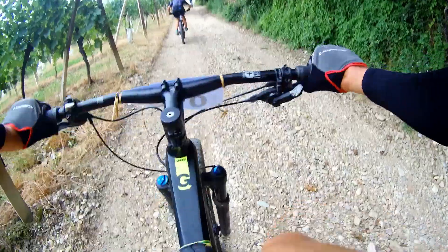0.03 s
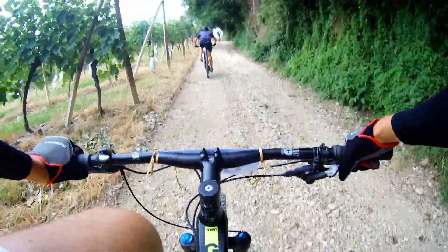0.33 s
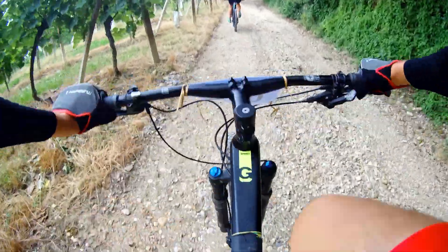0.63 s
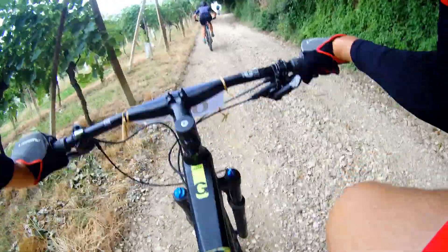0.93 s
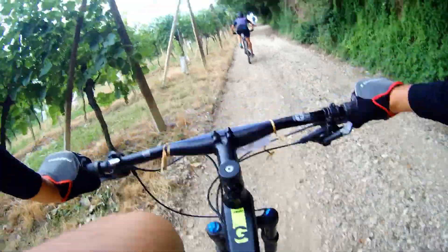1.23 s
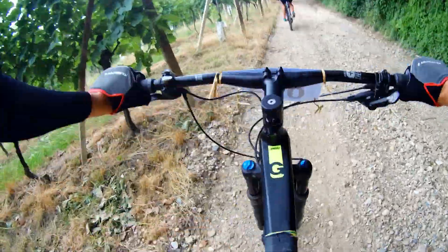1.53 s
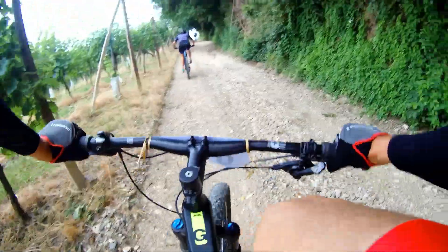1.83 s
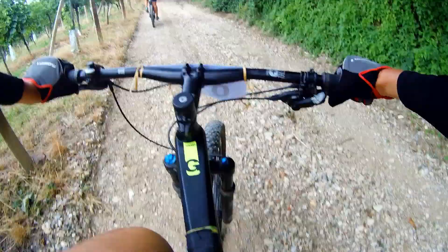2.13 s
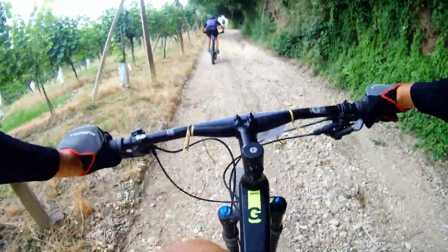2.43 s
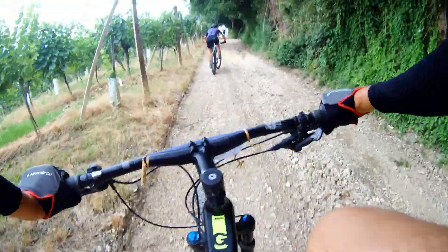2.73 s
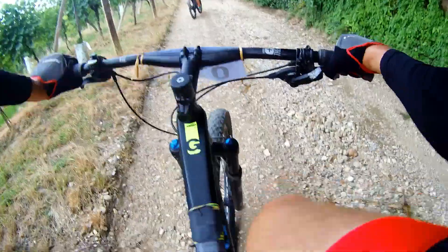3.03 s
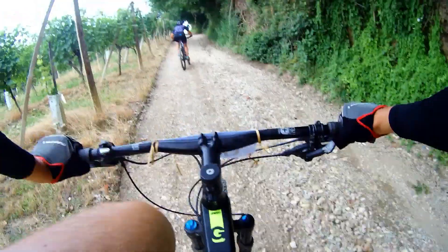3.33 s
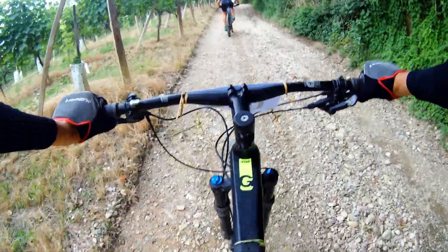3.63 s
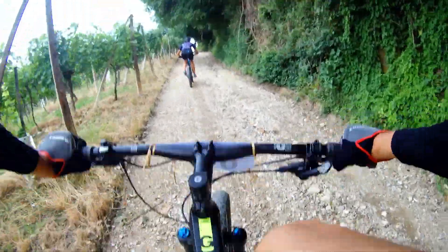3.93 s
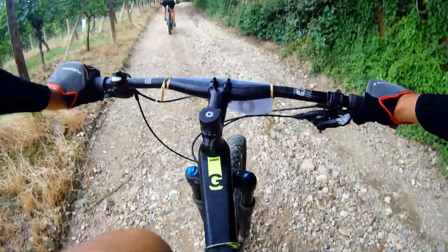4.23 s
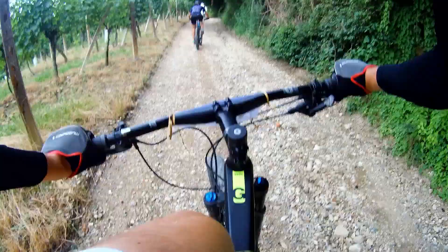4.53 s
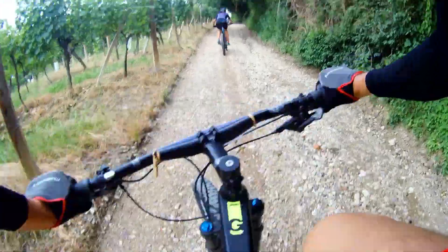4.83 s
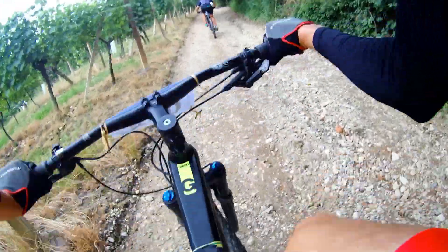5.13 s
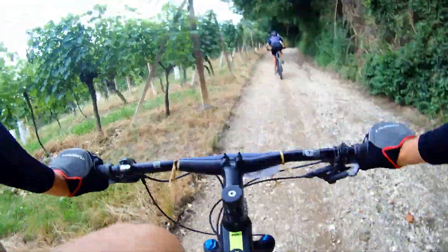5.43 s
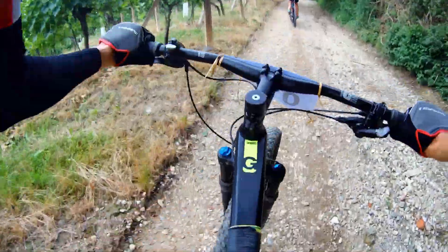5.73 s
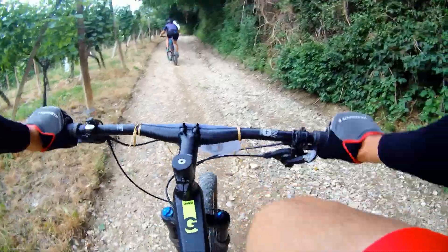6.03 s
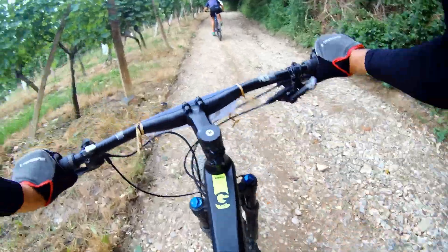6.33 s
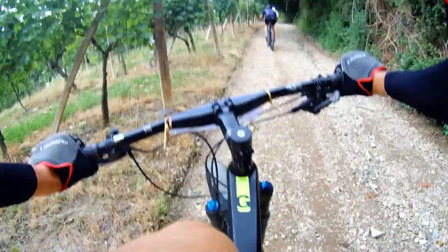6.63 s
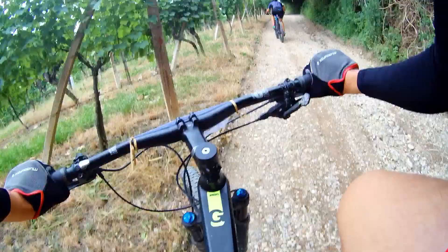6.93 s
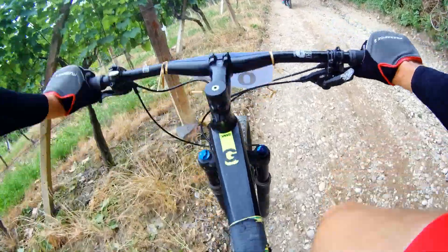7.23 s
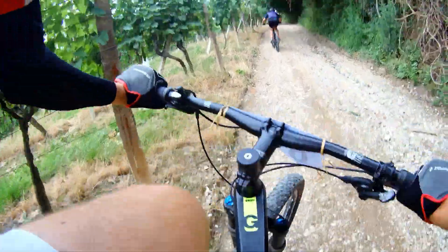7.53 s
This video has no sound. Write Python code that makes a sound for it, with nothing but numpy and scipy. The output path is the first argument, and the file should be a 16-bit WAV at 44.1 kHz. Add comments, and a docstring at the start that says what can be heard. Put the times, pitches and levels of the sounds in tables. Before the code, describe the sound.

Dull, regular thumps pulse over bike tyres rumbling and crunching on gravel, with scattered knocks, clicks and a thin hum.

```python
"""Mountain bike on loose gravel

A climb, heard from a camera in a closed case on the rider's chest. Dull, even thumps, most likely
the racing pulse, swing the camera on its strap; the mount knocks in its play. Tyres rumble and crunch
by countless small impacts, stones click, the case hums at resonance, and a limiter ducks on big blows."""
import sys
import numpy as np
from scipy import signal
from scipy.fft import rfft, irfft, next_fast_len
from scipy.io import wavfile
from scipy.ndimage import minimum_filter1d, map_coordinates

SR = 44100
rng = np.random.default_rng(int(sys.argv[2]) if len(sys.argv) > 2 else 0)


def master(y):
    """Save y as 16-bit WAV."""
    cut = np.clip(np.atleast_2d(y).T, -1, 1)
    pcm = np.round(cut * 32767)  # scale
    wavfile.write(sys.argv[1], SR, pcm.astype(np.int16))


N = 338247


def amp(db):
    """Amplitude ratio of a level in decibels."""
    return 10 ** (np.asarray(db) / 20)


def unit(x):
    """Normalisation to rms 1."""
    return x / np.sqrt(np.mean(x ** 2) + 1e-20)


def wobble(rate):
    """Slow random modulation: a spline through rate knots a second."""
    knots = rng.standard_normal(int(N * rate / SR) + 4)
    return map_coordinates(knots, [np.arange(N) * rate / SR])


def filtered(x, response):
    """Linear filtering: the spectrum of x times a frequency response."""
    size = next_fast_len(N + 8192)
    return irfft(rfft(x, size) * response(np.fft.rfftfreq(size, 1 / SR)), size)[:N]


def coloured(x, spectrum):
    """Spectral shaping by (frequency_hz, level_db) points, at rms 1."""
    f, db = np.transpose(spectrum)
    return unit(filtered(x, lambda hz: amp(np.interp(np.log(hz + 1), np.log(f), db))))


def add(track, start_s, sound):
    """Superposition of a sound on the track."""
    start = max(0, round(start_s * SR))
    part = track[start:start + len(sound)]
    part += sound[:len(part)]


def strokes(rows):
    """Amplitude envelope of tapered (start_s, length_s, level_db) bursts."""
    out = np.zeros(N)
    for start_s, length_s, db in rows:
        add(out, start_s, amp(db) * signal.windows.tukey(int(length_s * SR), .5))
    return out


def impacts(per_s, spread_db, clump_db):
    """Shot noise: random contacts of unequal size, clumped in strength, at rms 1."""
    contact = rng.random(N) < per_s / SR
    size = amp(spread_db * np.minimum(rng.exponential(size=N), 4))
    return unit(contact * size * rng.standard_normal(N) * amp(clump_db * wobble(45)))


def swing(t, hz, rise_s, fall_s, sag_s):
    """Damped oscillation of the camera on its strap, furthest at t = 0 and slowing as it dies."""
    swell = np.where(t < 0, np.exp(-.5 * (t / rise_s) ** 2), 1 / (1 + (t / fall_s) ** 2))
    turns = hz * sag_s * (1 - np.exp(-t / sag_s))
    return swell * signal.windows.tukey(len(t), .5) * np.cos(2 * np.pi * turns)


# spectrum of the microphone's hiss: frequency_hz, level_db
HISS_SPECTRUM = [(1000, 0.62), (5000, 0.74), (8000, -1), (11500, -1.3), (13000, 0.39), (14000, -1.3),
                 (16000, -1.6)]

def hiss(level_db=-52.5):
    """Self-noise: the microphone adds a steady, nearly white floor."""
    return amp(level_db) * coloured(rng.standard_normal(N), HISS_SPECTRUM)


# roughness of the track against its usual state: time_s, level_db
TRACK_ROUGHNESS = [(0.0, -0.5), (0.51, -2), (0.75, 3), (1.2, -1.7), (2.41, 1), (2.69, -0.5), (2.89, -4),
                   (2.99, 1.0), (4.34, 1), (4.74, 1.5), (4.96, -2.5), (5.29, 1.3), (5.55, -3.5), (5.8, 2),
                   (6.59, -2), (6.75, 0.6), (7.67, -2.5)]

def roughness_db():
    """Surface excitation: the track's roughness, interpolated to every sample."""
    time_s, level_db = np.transpose(TRACK_ROUGHNESS)
    return np.interp(np.arange(N) / SR, time_s, level_db)


def case_hum(hz=1400, width_hz=80, level_db=-43, follow=0.35, waver_db=2.6):
    """Forced resonance: tyre noise sustains the main mode of the case as a thin, wavering hum."""
    resonance = lambda f: (1j * f * 2 * width_hz / (hz ** 2 - f ** 2 + 2j * f * width_hz)) ** 2
    ring = unit(filtered(impacts(per_s=3000, spread_db=2, clump_db=1.5), resonance))
    return ring * amp(level_db + follow * roughness_db() + waver_db * wobble(6.5))


# spectra of the shaken rider, rolling tyres and crunching gravel: frequency_hz, level_db
SHAKE_SPECTRUM = [(8, -18), (20, -1.5), (36, 0), (60, -11.5), (100, -14), (160, -22), (300, -47),
                  (800, -120)]
ROLL_SPECTRUM = [(60, -27), (130, -2), (200, 0), (300, -2.5), (480, -6.5), (700, -11.5), (1080, -10.5),
                 (1170, -12), (1400, -21), (1800, -18.5), (2600, -53), (5000, -120)]
CRUNCH_SPECTRUM = [(900, -36), (1700, 3.5), (2150, 0), (2450, 1), (2800, 2), (3400, -4.5), (3950, 4.5),
                   (4300, -10.5), (5500, -26), (9000, -32), (14000, -120)]

def tyres(shake_db=-25, roll_db=-39, crunch_db=-53, shake_drift_db=2, drift_db=0.77, clump_db=2.37):
    """Rolling noise: rougher track shakes the rider harder, and the gravel rolls and crunches louder."""
    rough_db = roughness_db()
    clumps = unit(amp(clump_db * wobble(30)))  # stones shift in clumps under the knobs
    shake = amp(shake_db + 0.9 * rough_db + shake_drift_db * wobble(7))
    shake *= coloured(rng.standard_normal(N), SHAKE_SPECTRUM)
    roll = amp(roll_db + 0.66 * rough_db + drift_db * wobble(7))
    roll *= coloured(impacts(per_s=1800, spread_db=1, clump_db=0.56), ROLL_SPECTRUM)
    crunch = amp(crunch_db + 0.63 * rough_db + drift_db * wobble(7))
    crunch *= coloured(impacts(per_s=2500, spread_db=0, clump_db=1), CRUNCH_SPECTRUM)
    return shake + clumps * (roll + crunch)


# stones slide from under a tyre: start_s, length_s, level_db
STONE_SKIDS = [(1.03, 0.042, -34), (1.19, 0.041, -33.5), (2.64, 0.083, -38), (3.16, 0.065, -36),
               (4.68, 0.13, -40), (5.175, 0.036, -34.5), (6.745, 0.063, -37.5)]

def skids(crunch_db=-14):
    """Sliding friction: stones grind past each other in coarse bursts."""
    grind = impacts(per_s=1200, spread_db=2, clump_db=0.5)
    crunch = amp(crunch_db) * coloured(grind, CRUNCH_SPECTRUM)
    return strokes(STONE_SKIDS) * (coloured(grind, ROLL_SPECTRUM) + crunch)


# spectrum of rubbed cloth: frequency_hz, level_db
CLOTH_SPECTRUM = [(1000, -2), (2200, -3), (3000, -3), (3800, -6), (4230, 5.5), (4600, -7), (5000, -9),
                  (6000, -12.5), (9000, -30), (14000, -120)]
# the strap rubs on cloth: start_s, length_s, level_db
STRAP_RUBS = [(0.83, 0.091, -42.5), (0.915, 0.032, -42.5), (1.019, 0.031, -49), (1.884, 0.039, -37.5),
              (4.95, 0.036, -47)]

def rubs():
    """Stick-slip friction: cloth catches and slips under the strap in short, thin scrapes."""
    slips = impacts(per_s=3200, spread_db=-1.5, clump_db=1.5)
    return strokes(STRAP_RUBS) * coloured(slips, CLOTH_SPECTRUM)


# modes of the camera case: pitch_hz, level_db, t60_s
CASE_MODES = [(1013, -4.5, 0.023), (1362, -4, 0.037), (1940, -15, 0.018)]

def case_ring(t, scatter_db):
    """Free vibration: the struck case rings in decaying modes, at new strengths for each blow."""
    return sum(amp(db + rng.normal(0, scatter_db) - 60 * t / t60) * np.sin(2 * np.pi * hz * t)
               for hz, db, t60 in CASE_MODES)


def faint_ticks(per_s=1.5, level_db=-32.5, clack_hz=1330, ping_db=-43, spread_db=2.5, pitch_spread=0.18):
    """Random impacts of small stones, one in each time slot, as rows like those of STONE_TICKS."""
    rows = []
    for slot in range(round(per_s * N / SR)):
        size, pitch, ping = rng.standard_normal(3)
        start_s = (slot + rng.random()) / per_s
        hz = clack_hz * np.exp(pitch_spread * pitch)
        rows.append((start_s, level_db + spread_db * size, hz, ping_db + spread_db * ping))
    return rows


# stones and loose parts strike the bike (levels are relative): start_s, level_db, clack_hz, ping_db
STONE_TICKS = [(0.866, -27, 1380, -34), (1.026, -26, 1320, -31), (2.1388, -23, 1515, -49),
               (2.6435, -27.5, 1360, -31.5), (3.62, -22, 1400, -15.5), (3.866, -23, 1400, -29),
               (4.182, -22.5, 1020, -54), (4.789, -22.5, 1460, -39), (4.9517, -20, 1336, -35),
               (5.1775, -26, 1380, -48), (5.978, -26.5, 1360, -33), (6.3194, -24, 1506, -29.5),
               (6.85, -22.5, 1320, -45), (6.957, -20, 1370, -32.5), (7.1009, -17, 1310, -23),
               (7.241, -25.5, 1380, -24.5), (7.473, -15.5, 1346, -36)]

def ticks(ring_db=-3, clack_db=4, clack_t60=0.023, ping_boost_db=10, ping_hz=2650, ping_t60=0.0074,
          attack_s=0.0018, grit=0.37, grit_t60=0.019):
    """Hard impact: a brief contact excites a clack, a gritty ping and the modes of the case."""
    out, t = np.zeros(N), np.arange(SR // 16) / SR
    onset = 1 - np.exp(-(t / attack_s) ** 2)
    band = signal.butter(4, [1800, 3500], "bandpass", fs=SR, output="sos")
    for start_s, db, clack_hz, ping_db in STONE_TICKS + faint_ticks():
        scratch = unit(signal.sosfilt(band, rng.standard_normal(len(t)))) * amp(-60 * t / grit_t60)
        ping = np.sin(2 * np.pi * ping_hz * rng.normal(1, 0.026) * t) * amp(-60 * t / ping_t60)
        clack = amp(clack_db - 60 * t / clack_t60) * np.sin(2 * np.pi * clack_hz * t)
        body = clack + amp(ring_db) * case_ring(t, scatter_db=6)
        bright = amp(ping_db + ping_boost_db) * (ping + grit * scratch)
        add(out, start_s, onset * (amp(db) * body + bright))
    return out


# the wheels drop over larger stones: peak_s, level_db, pitch_hz
WHEEL_JOLTS = [(0.751, -17.5, 69), (.765, -15, 201), (2.663, -18, 36), (3.209, -12, 37.8),
               (3.312, -13, 47.7), (4.778, -5, 30.2), (5.26, -10.5, 31.7), (6.789, -18.5, 66)]

def jolts(rise_turns=0.63, fall_turns=0.62, sag_s=0.17, lead_s=0.06):
    """Shock excitation: larger stones jolt the rider and set the camera swinging."""
    out, t = np.zeros(N), np.arange(SR // 5) / SR - lead_s
    for peak_s, db, hz in WHEEL_JOLTS:
        add(out, peak_s - lead_s, amp(db) * swing(t, hz, rise_turns / hz, fall_turns / hz, sag_s))
    return out


# modes of the camera mount: pitch_hz, level_db, t60_s
MOUNT_MODES = [(314, -14, 0.024), (422, -26, 0.056)]
# the mount hits its stop: time_s, level_db, case_ring_db (relative to the blow)
MOUNT_KNOCKS = [(0.5712, 1, -8.5), (1.9133, 4.5, -10.5), (2.4532, 3.5, -10), (2.6086, -3, -15),
                (3.0626, 2.5, -17), (3.4687, 5.5, -9.5), (4.002, -1.5, -11.5), (4.5687, 3.5, -8),
                (5.659, -4, -18), (6.1912, 2.5, -15.5), (7.109, 3.5, -12.5)]

def knocks(contact_s=0.00076, stiffening=1.33, roundness=2.44, push_db=-1, rebound_s=0.00658,
           rock_db=-2, lead_s=0.06):
    """Impact on a stiffening contact: a rounded push rings mount and case, then the camera rocks back."""
    out, clock = np.zeros(N), np.arange(SR // 5) / SR - lead_s
    t = np.maximum(clock, 0)
    rock = -amp(rock_db) * swing(clock - rebound_s, hz=59.3, rise_s=0.002, fall_s=0.014, sag_s=0.135)
    mount = sum(amp(db - 60 * t / t60) * np.sin(2 * np.pi * hz * t) for hz, db, t60 in MOUNT_MODES)
    for time_s, db, case_ring_db in MOUNT_KNOCKS:
        progress = t / (contact_s * amp(-stiffening * db))  # harder blows are shorter
        push = (progress * np.exp(1 - progress)) ** roundness
        onset = 1 - np.exp(-progress ** 2)
        ring = onset * (mount + amp(case_ring_db) * case_ring(t, scatter_db=2))
        add(out, time_s - lead_s - contact_s / 2, amp(db) * (amp(push_db) * push + rock + ring))
    return out


# the even beat that comes through the chest strap
FIRST_BEAT_S, BEAT_PERIOD_S = 0.2485, 0.3206
BEAT_TIMES_S = np.arange(FIRST_BEAT_S, N / SR, BEAT_PERIOD_S)

def strap_shudder(level_db=-24, band_hz=(85, 145), delay_s=0.0039, width_s=0.013):
    """Transient vibration: each beat shakes the strap in a burst of low, narrow-band noise."""
    t = np.arange(N) / SR
    envelope = sum(np.exp(-.5 * ((t - beat_s - delay_s) / width_s) ** 2) for beat_s in BEAT_TIMES_S)
    band = signal.butter(2, band_hz, "bandpass", fs=SR, output="sos")
    return amp(level_db) * envelope * unit(signal.sosfilt(band, rng.standard_normal(N)))


def thumps(pitch_hz=42.5, level_db=0.7, rise_s=0.01, fall_s=0.022, sag_s=0.074, lead_s=0.06,
           swell_db=2.4, swell_period_s=1.326, swell_peak_s=0.31, scatter_db=1.3, pitch_scatter=0.037):
    """Periodic forcing: the chest's beat swings the camera, swelling about every fourth time."""
    out, t = np.zeros(N), np.arange(SR // 5) / SR - lead_s
    for beat_s in BEAT_TIMES_S:
        strength, pitch, rise_db, fall_db = rng.standard_normal(4)  # no two beats swing alike
        swell = np.cos(2 * np.pi * (beat_s - swell_peak_s) / swell_period_s)
        db = level_db + swell_db * swell + scatter_db * strength
        hz = pitch_hz * (1 + pitch_scatter * pitch)
        thump = swing(t, hz, rise_s * amp(rise_db), fall_s * amp(fall_db), sag_s)
        add(out, beat_s - lead_s, amp(db) * thump)
    return out


def scene():
    """Superposition: camera and track sounds sum at the microphone, over its own hiss."""
    floor = hiss()
    camera = thumps() + strap_shudder() + jolts() + knocks() + rubs()
    track = tyres() + skids() + case_hum() + ticks()
    return (floor + track + camera)[None]


def limiter(x, ceiling_db=-2.5, attack_s=0.00069, hold_s=0.03, release_db_per_s=160):
    """Peak limiting: the gain drops quickly on a peak, holds, then climbs back."""
    needed_db = np.minimum(0, ceiling_db - 20 * np.log10(np.abs(x) + 1e-9))
    half = int(hold_s * SR / 2)
    held_db = minimum_filter1d(needed_db, 2 * half + 1, origin=half)
    climb_db = release_db_per_s * np.arange(N) / SR
    gain_db = np.minimum.accumulate(held_db - climb_db) + climb_db
    pole = np.exp(-1 / (attack_s * SR))
    return x * amp(signal.lfilter([1 - pole], [1, -pole], gain_db))


def record(dry, knee=14, top_hz=15400):
    """Saturation and band limiting: the camera rounds off what passes its limiter, then cuts the top."""
    limited = limiter(dry[0])
    clipped = limited / (1 + np.abs(limited) ** knee) ** (1 / knee)
    return filtered(clipped, lambda hz: hz < top_hz)[None]


dry = scene()
out = record(dry)
master(out)
```